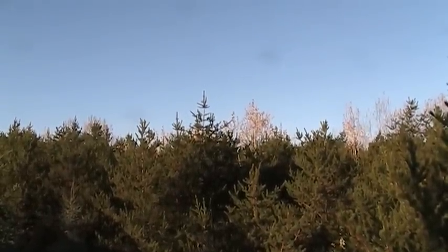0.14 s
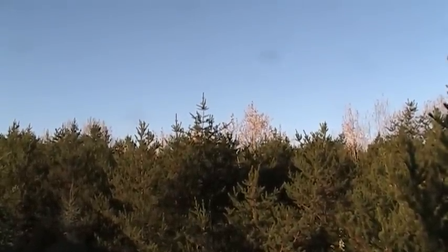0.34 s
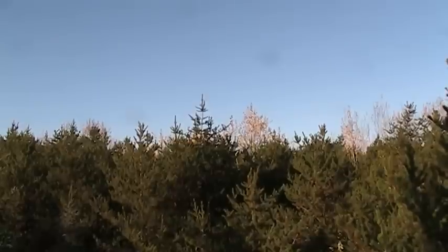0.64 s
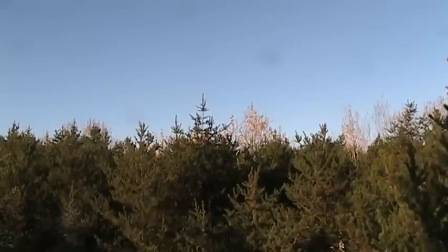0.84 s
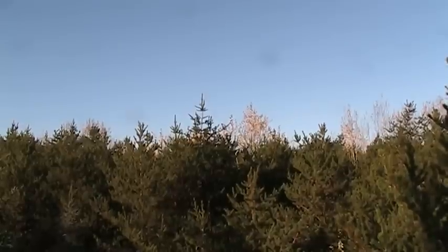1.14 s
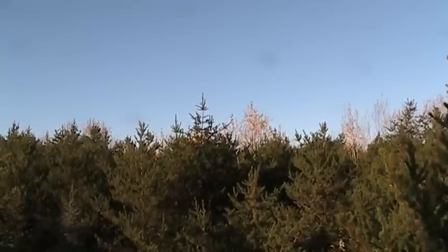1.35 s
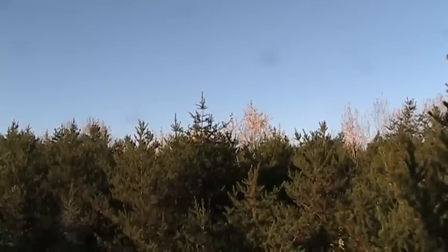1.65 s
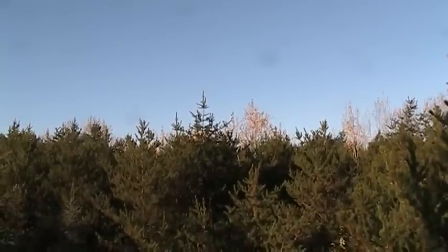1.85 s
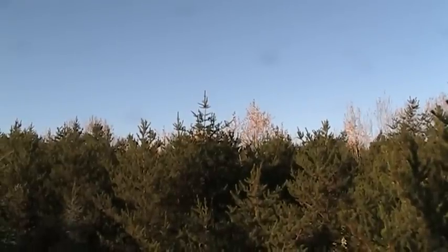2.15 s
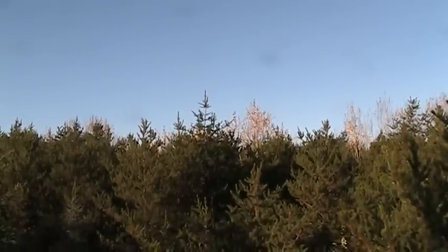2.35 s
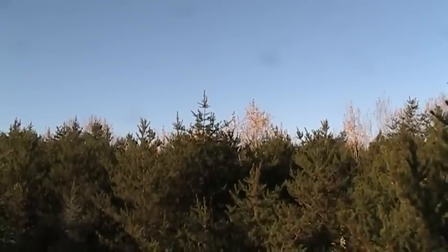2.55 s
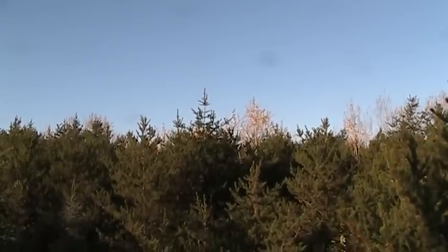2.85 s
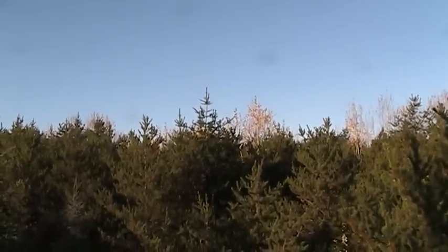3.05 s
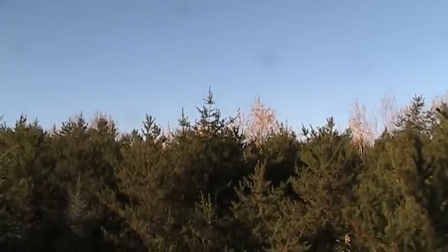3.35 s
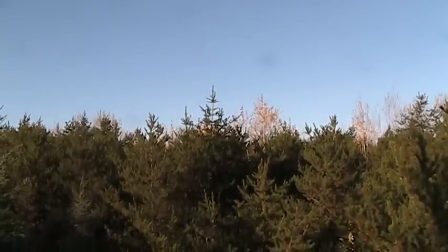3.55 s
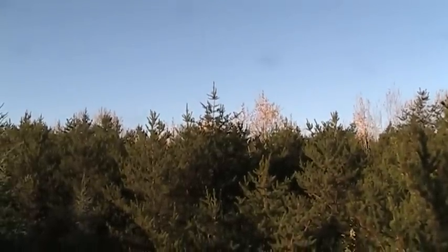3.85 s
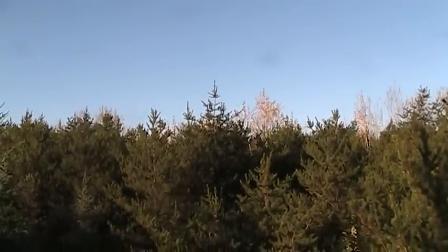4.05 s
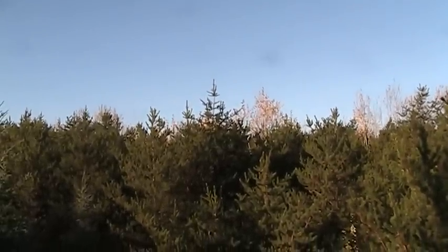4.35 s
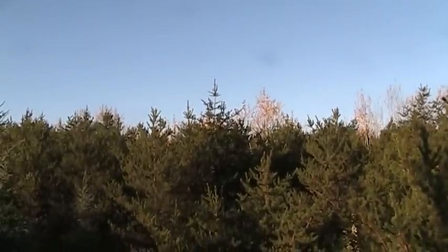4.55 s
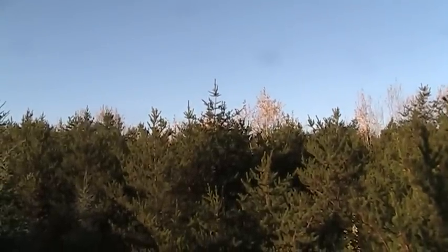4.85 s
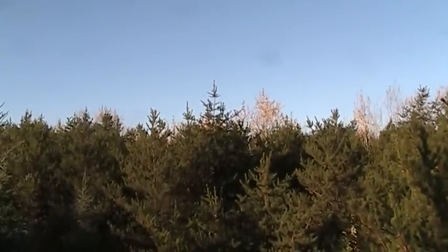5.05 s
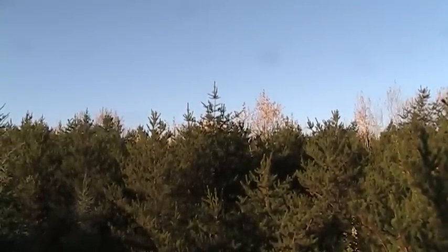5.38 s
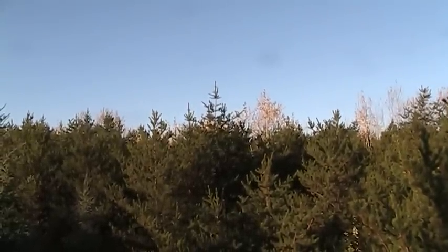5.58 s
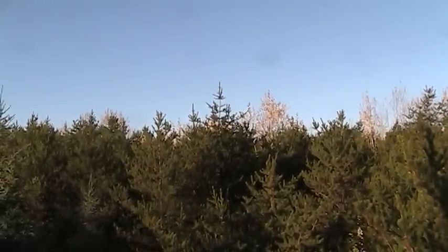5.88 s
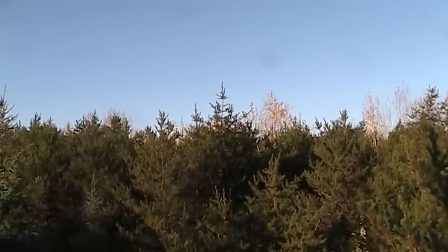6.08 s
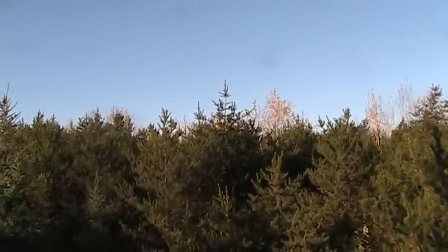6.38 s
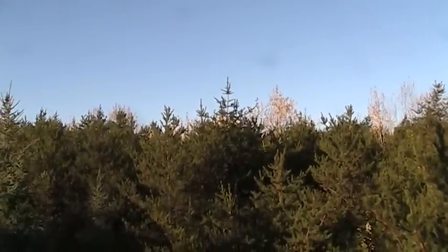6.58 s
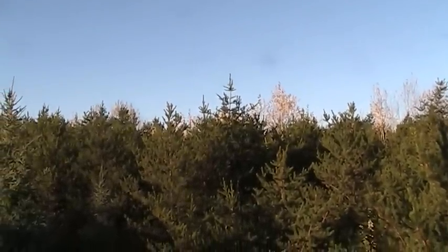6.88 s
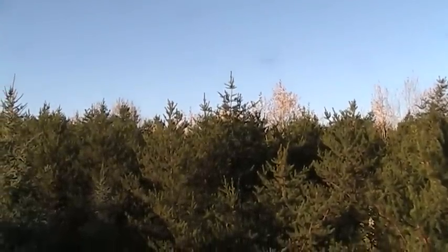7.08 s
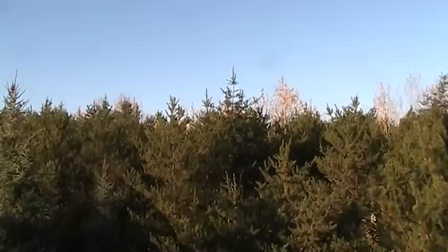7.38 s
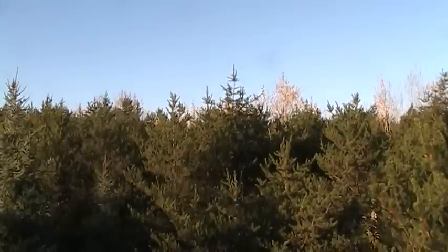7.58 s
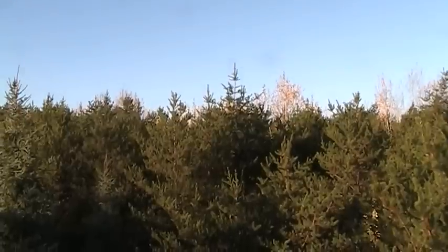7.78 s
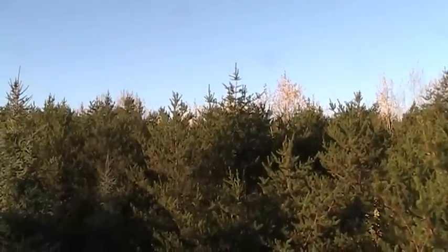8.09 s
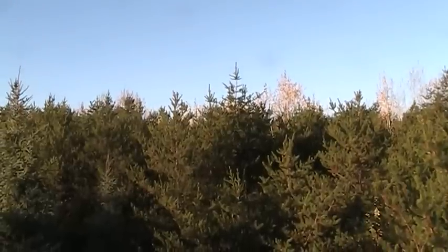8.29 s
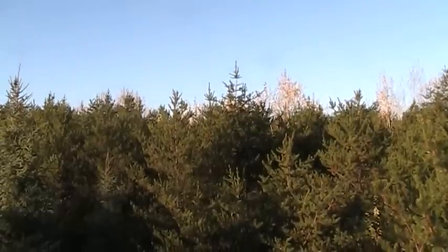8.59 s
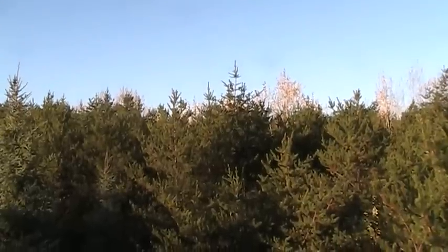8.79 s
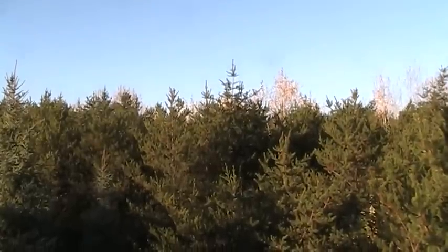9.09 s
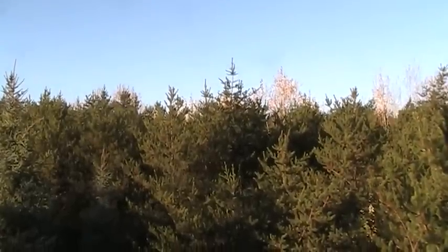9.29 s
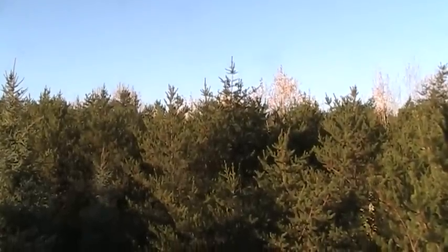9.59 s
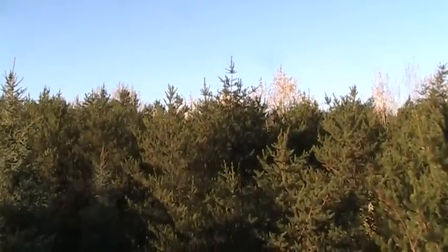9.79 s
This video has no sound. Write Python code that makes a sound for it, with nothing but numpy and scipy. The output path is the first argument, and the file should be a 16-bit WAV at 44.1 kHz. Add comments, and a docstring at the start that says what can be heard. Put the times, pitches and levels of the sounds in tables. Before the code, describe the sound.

Open evergreen woodland in still air, heard through a small camera's stereo microphone with a constant soft, wide hiss. A distant wolf gives a smooth, almost pure howl that holds and droops, then leaves a reverberant tail. Two seconds later it scoops abruptly up to a higher note and slides down in stages, holds low, sags and ends. Small mechanical ticks occur nearby before, between and during the howls.

```python
"""Pine wood: a wolf howls twice, some way off; one note sags and ends, the next yelps up and steps down.
The voice is a sum of partials sliding through fixed formants. Decaying noise stands for the trees that
scatter it: slides beat against their own echoes and a faint tail hangs on.
Near the camera: a steady hush of shaped noise, a faint hum of wavering sines, a faint buzz of
repeated hiss bursts, and three small mechanical ticks of ringing casing modes."""
import sys
import numpy as np
from scipy import signal
from scipy.fft import rfft, irfft, next_fast_len
from scipy.io import wavfile
from scipy.ndimage import uniform_filter1d

SR = 44100
rng = np.random.default_rng(int(sys.argv[2]) if len(sys.argv) > 2 else 0)


def transcribe(signal):
    """Save signal, clipped to [-1, 1], as a 16-bit WAV file at the path in sys.argv[1]."""
    frames = np.atleast_2d(signal).T
    limited = np.clip(frames, -1, 1)
    pcm = np.round(limited * 32767).astype(np.int16)
    wavfile.write(sys.argv[1], SR, pcm)


N = 437913

# First howl: held, then sags. Each row: time in seconds, pitch in Hz, relative effort in dB.
FIRST_HOWL_PATH = [(0.0, 382.5, 1), (0.33, 380.2, 0.5), (0.5, 377, -1), (0.78, 375.7, 1.5),
                   (1.31, 375.8, 0), (1.56, 358.5, -0.5), (2.15, 338.4, -.5), (2.36, 323.6, -0.5),
                   (2.72, 330.3, 1), (2.92, 332.3, -1), (2.975, 323.4, -1)]
# Second howl: scoops up, breaks to a high note, steps down. Each row: time in seconds, pitch in Hz,
# relative effort in dB.
SECOND_HOWL_PATH = [(5.025, 508, -18.5), (5.059, 551.5, -5.5), (5.121, 599, 0), (5.135, 683, -4.5),
                    (5.185, 711.5, -1.5), (5.27, 669, 0.5), (5.46, 609, -2.5), (5.76, 589.7, -1),
                    (5.961, 570.4, -2), (6.269, 548.5, 1), (6.42, 520, -.5), (6.67, 505.7, 0),
                    (6.78, 484.3, 0.5), (6.871, 447, -1.5), (7.14, 423.5, -0.5), (7.4, 413.8, -0.5),
                    (7.83, 412, 0), (8.7, 398, 1), (8.9, 374.4, -3.5), (9.13, 358, -2), (9.2, 343.9, -1)]
# Effort fade at the end of the first and the second howl. Each entry: rate in dB per second.
RELEASE_FADE_DB_PER_S = [128, 58]
# Vocal folds, partials one to four. Each entry: relative strength in dB.
FOLD_PARTIALS_DB = [0, 5.5, 0.7, -9]
# Overtone richness, fullest in mid-range. Each row: pitch in Hz, gain of partials two to four in dB.
OVERTONE_RICHNESS = [(270, -15.5), (325, -12.5), (350, -5), (380, 0.3), (410, -2.5), (450, -4), (500, -2),
                     (700, -9)]
# Peaks and hollows of mouth and path, for the main partials. Each row: frequency in Hz, gain in dB.
FORMANT_GAIN = [(260, -52), (300, -53), (325, -42.5), (375, -45), (410, -35.5), (520, -39), (640, -44.5),
                (750, -46.5), (860, -47.5), (1000, -51), (1130, -40), (1220, -40.5), (1430, -52.5),
                (1560, -51.5), (1720, -54), (1900, -62), (2100, -79)]
# Throat, for the higher partials. Each row: frequency in Hz, level against the third partial in dB.
THROAT_GAIN = [(1600, -9), (1720, -23.5), (1900, -41), (2100, -42), (2250, -32.5), (2295, -23.5),
               (2350, -45), (2420, -34.5), (2800, -57), (4000, -54)]
# Brief fades of single partials on the way through the trees. Each row: centre in seconds, partial number,
# depth in dB, half-length (to 1/e of the depth) in seconds.
PARTIAL_FADES = [(.49, 2, -4, .12), (0.498, 1, -1, 0.065), (0.638, 2, -13, 0.044), (0.704, 1, -6, 0.049),
                 (.87, 4, -15, 0.12), (1.052, 2, -8.5, .07), (1.314, 1, -4, 0.028), (2.4, 2, -4, 0.16),
                 (5.76, 1, -8.5, 0.034), (6.18, 1, -15, .025), (7.45, 2, -10, 0.061), (7.949, 2, -9, 0.045),
                 (7.996, 1, -5, 0.073), (8.55, 2, -7, 0.33)]
# Colour of the return from the near trees. Each row: frequency in Hz, gain in dB.
NEAR_TREE_GAIN = [(380, -20), (600, -11.5), (800, -3.5), (1130, -8), (1260, -8.5), (1340, -0.5), (1420, -5),
                  (1600, -8.5), (2400, -1)]
# Colour of the return from deep in the wood. Each row: frequency in Hz, gain in dB.
DEEP_WOOD_GAIN = [(330, -15), (410, -15.5), (600, -16), (800, -14.5), (1150, -19.5), (2400, -20)]
# Decay rate deep in the wood. Each row: frequency in Hz, time to fall 60 dB in seconds.
DEEP_WOOD_T60 = [(300, 9.7), (700, 7.9), (1200, 5.1), (3000, 1.5)]
# Part of the howl that differs between the microphone ports. Each row: frequency in Hz, gain in dB.
PORT_SPREAD = [(350, -47), (750, -26), (1100, -18.5), (1400, -27), (2500, -7)]
# Camera ticks. Each row: time in seconds, nominal peak in dB, gain factor of the brightest modes.
CAMERA_TICKS = [(1.3078, -38, .3), (3.4588, -36, 0.9), (7.296, -39, 0.24)]
# Casing modes. Each row: frequency in Hz, relative level in dB, time to fall 60 dB in seconds,
# opposed part against the common part in dB.
CASING_MODES = [(1820, 0, 0.012, -15), (2086, -9, 0.043, -6), (3170, -7.5, 0.02, 11), (3000, -10, 0.012, 7),
                (4360, -2.5, 0.0048, -8), (5400, -15, .003, 0), (6500, -6, 0.0033, 0), (7950, -12, .003, 0)]
# Hush common to both ports. Each row: frequency in Hz, relative density in dB per Hz.
COMMON_HUSH = [(15, -43), (30, -19), (50, -12), (90, -5.5), (160, -3.5), (260, -4.5), (400, -5), (650, -11),
               (1100, -15), (2000, -19), (3100, -22.5), (7000, -28), (15500, -34)]
# Hush opposed between the ports. Each row: frequency in Hz, relative density in dB per Hz.
OPPOSED_HUSH = [(15, -70), (25, -38), (43, -37), (58, -25), (148, -8.5), (227, -4.5), (368, -4.5),
                (421, -2), (495, -7.5), (537, -5), (614, -6), (1300, -10.5), (3620, -19), (9540, -31),
                (15500, -37.5)]
# Hum lines. Each row: frequency in Hz, rms level before the microphone in dB.
HUM_LINES = [(59.94, -72.5), (89, -72.5), (119.88, -71.5)]
# Colour of the buzz. Each row: frequency in Hz, relative density in dB per Hz.
BUZZ_COLOUR = [(800, -15), (2500, 2.0), (6000, -2.0), (15000, -20)]
# Microphone response. Each row: frequency in Hz, gain in dB.
MICROPHONE_GAIN = [(11000, 0.53), (15500, -1.3)]

# second howl: even partials are weak until the voice breaks upward
BREAK_S, HOLLOW_DB = 5.135, -20
# end of each howl: length and pitch drop
RELEASE_S, DROP_HZ_PER_S = 0.137, 560
# near echoes: gain on a held and on a fast-sliding note, slide at half-way
HELD_DB, SLIDING_DB, HALF_SLIDE_OCTAVES_PER_S = -6, 1, 0.024
# near echoes: high notes carry more strongly into the trees
CARRY_DB_PER_OCTAVE, MIDDLE_HZ = 6, 420
# hush: rms before the microphone
COMMON_HUSH_DB, OPPOSED_HUSH_DB = -55.5, -49.5
BAND_EDGE_HZ = 15700


def amp(db):
    """Decibels to gain."""
    return 10 ** (np.asarray(db) / 20)


def evened(x):
    """Scales to rms 1."""
    return x / np.sqrt(np.mean(x ** 2) + 1e-20)


def read(points, hz):
    """Reads a curve on a log-frequency axis, flat beyond its ends."""
    f, value = np.transpose(points)
    return np.interp(np.log(hz + 1), np.log(f + 1), value)


def add(mix, start_s, sound):
    """Mixes a sound in at a time."""
    part = mix[max(round(start_s * SR), 0):][:len(sound)]
    part += sound[:len(part)]


def coloured(x, gain_curve):
    """Filters by a gain curve in dB."""
    gain = amp(read(gain_curve, np.fft.rfftfreq(2 * N, 1 / SR)))
    return irfft(rfft(x, 2 * N) * gain)[:N]


def waver(size, rate_hz):
    """Slow random curve, rms 1 over the scene, up to about a rate."""
    hz = np.fft.rfftfreq(next_fast_len(N), 1 / SR)
    bins = rng.standard_normal(len(hz)) + 1j * rng.standard_normal(len(hz))
    curve = irfft(bins * np.exp(-(hz / rate_hz) ** 2), 2 * len(hz))
    return evened(curve)[:size]


def ports(common, opposed):
    """Left and right from what they share and what they oppose."""
    return np.array([common + opposed, common - opposed])


def howl(path, fade_db_per_s, jitter=0.0014, jitter_hz=45, flutter_db=0.32, flutter_hz=25,
         fading_db=4.0, fading_hz=12, count=7):
    """Nearly pure voice: four main partials slide through fixed formants; the throat shapes faint higher ones."""
    s, pitch_hz, effort_db = np.transpose(path)
    t = np.arange(s[0], s[-1] + RELEASE_S, 1 / SR)
    released_s = np.maximum(t - s[-1], 0)
    hz = np.interp(t, s, pitch_hz) - DROP_HZ_PER_S * released_s
    level_db = np.interp(t, s, effort_db) - fade_db_per_s * released_s
    breaks = s[0] < BREAK_S < s[-1]
    hollow_db = HOLLOW_DB * breaks * np.interp(t, [BREAK_S - .01, BREAK_S], [1, 0])
    phase = 2 * np.pi * np.cumsum(hz * (1 + jitter * waver(len(t), jitter_hz))) / SR

    main_db = []
    for k, fold_db in enumerate(FOLD_PARTIALS_DB, 1):
        db = level_db + fold_db + read(FORMANT_GAIN, k * hz)
        if k > 1:
            db = db + read(OVERTONE_RICHNESS, hz)
        if k % 2 == 0:
            db = db + hollow_db
        main_db.append(db)

    voice = np.zeros(len(t))
    for k in range(1, count + 1):
        if k <= len(main_db):
            db = main_db[k - 1] + faded(t, k) + flutter_db * waver(len(t), flutter_hz)
        else:  # short waves fade in and out on their way through the trees
            db = main_db[2] + read(THROAT_GAIN, k * hz) + fading_db * waver(len(t), fading_hz)
        voice += np.sqrt(2) * amp(db) * np.sin(k * phase)
    return s[0], voice * signal.windows.tukey(len(t), .004), hz


def faded(t, k):
    """Brief bell-shaped fades of one partial, in dB."""
    return sum(depth_db * np.exp(-((t - s) / half_s) ** 2)
               for s, partial, depth_db, half_s in PARTIAL_FADES if round(partial) == k)


def apart(hz):
    """Gain of the near echoes: they merge with a held note, stand apart from a high or sliding one."""
    octaves_per_s = np.abs(np.gradient(np.log2(hz))) * SR
    slide = np.abs(uniform_filter1d(octaves_per_s, size=SR // 4))
    sliding = slide / (slide + HALF_SLIDE_OCTAVES_PER_S)
    slide_db = HELD_DB + (SLIDING_DB - HELD_DB) * sliding
    return amp(slide_db + CARRY_DB_PER_OCTAVE * np.log2(hz / MIDDLE_HZ))


def scatter(x, t60_curve, delay_s, rise_s):
    """Echoes from countless trunks: 3 s of noise builds up, then each band dies at its own speed."""
    hz, t, noise = signal.stft(rng.standard_normal(3 * SR), SR, nperseg=512)
    age = np.maximum(t - delay_s, 0)
    shape = (1 - np.exp(-age / rise_s)) * amp(-60 * age / read(t60_curve, hz)[:, None])
    # equal energy in each band
    shape /= np.sqrt((shape ** 2).sum(1, keepdims=True) * t[1] * SR)
    response = signal.istft(noise * shape, SR, nperseg=512)[1]
    return signal.fftconvolve(x, response)[:N]


def wolf(near_t60_s=1.04):
    """The howls arrive directly, off the near trees, and from deep in the wood."""
    voice, thrown = np.zeros(N), np.zeros(N)
    for path, fade_db_per_s in zip((FIRST_HOWL_PATH, SECOND_HOWL_PATH), RELEASE_FADE_DB_PER_S):
        start_s, note, hz = howl(path, fade_db_per_s)
        add(voice, start_s, note)
        add(thrown, start_s, note * apart(hz))
    near = scatter(coloured(thrown, NEAR_TREE_GAIN), [(1000, near_t60_s)], delay_s=0.011, rise_s=0.014)
    far = scatter(coloured(voice, DEEP_WOOD_GAIN), DEEP_WOOD_T60, delay_s=0.12, rise_s=0.11)
    heard = voice + near + far
    # echoes come from all sides, so they reach the two ports a little differently
    spread = scatter(heard, [(1000, 0.22)], delay_s=.005, rise_s=.01)
    return ports(heard, coloured(spread, PORT_SPREAD))


def ticks(rise_s=0.00036, bright_hz=4000):
    """Each tick rings the casing's damped modes, some of which drive the two ports against each other."""
    common, opposed = np.zeros(N), np.zeros(N)
    t = np.arange(SR // 20) / SR
    for s, peak_db, bright in CAMERA_TICKS:
        for hz, db, t60_s, opposed_db in CASING_MODES:
            envelope = amp(peak_db + db - 60 * t / t60_s) * (1 - np.exp(-t / rise_s))
            ring = envelope * np.sin(2 * np.pi * hz * t)
            if hz > bright_hz:
                ring = ring * bright
            # short bending waves travel fastest, so the tick chirps downward
            arrival_s = s + 2 / hz
            add(common, arrival_s, ring)
            add(opposed, arrival_s, amp(opposed_db) * ring)
    return ports(common, opposed)


def hush():
    """Still air and microphone noise: shaped noise, made wide by the closely spaced ports."""
    common = evened(coloured(rng.standard_normal(N), COMMON_HUSH))
    opposed = evened(coloured(rng.standard_normal(N), OPPOSED_HUSH))
    return ports(amp(COMMON_HUSH_DB) * common, amp(OPPOSED_HUSH_DB) * opposed)


def hum(drift_rad=.25, drift_hz=3):
    """Faint low sine lines whose phases waver a little."""
    t = np.arange(N) / SR
    lines = np.zeros(N)
    for hz, db in HUM_LINES:
        phase = 2 * np.pi * hz * t + drift_rad * waver(N, drift_hz)
        lines += np.sqrt(2) * amp(db) * np.sin(phase)
    return lines


def buzz(level_db=-80, rate_hz=59.94, first_s=.0079, width_s=.0009):
    """Faint electrical buzz: one short burst of hiss per cycle of the lowest hum line."""
    period_s = 1 / rate_hz
    from_burst_s = (np.arange(N) / SR - first_s + period_s / 2) % period_s - period_s / 2
    hiss = coloured(rng.standard_normal(N), BUZZ_COLOUR)
    return amp(level_db) * evened(hiss * np.exp(-(from_burst_s / width_s) ** 2))


def scene(lean_db=0.3):
    """The wolf almost straight ahead, a touch to the left, over the small sounds near by."""
    return wolf() * amp([[lean_db], [-lean_db]]) + ticks() + hush() + hum() + buzz()


def record(dry):
    """The microphone dulls the very top; then the recorder's band limit."""
    heard = np.array([coloured(port, MICROPHONE_GAIN) for port in dry])
    band_limit = signal.firwin(1023, BAND_EDGE_HZ, window=("kaiser", 9), fs=SR)
    return signal.oaconvolve(heard, band_limit[None], "same")


dry = scene()
out = record(dry)
transcribe(out)
```